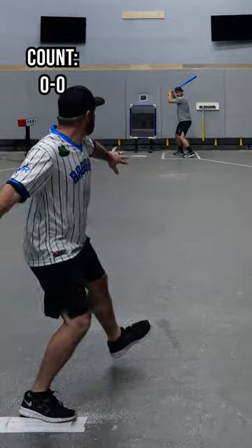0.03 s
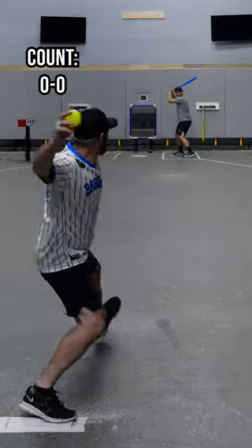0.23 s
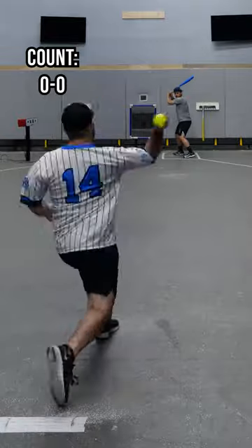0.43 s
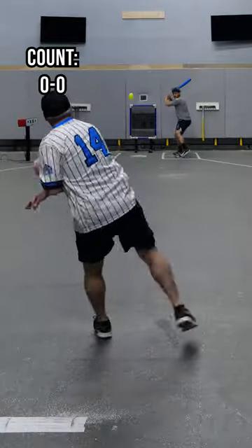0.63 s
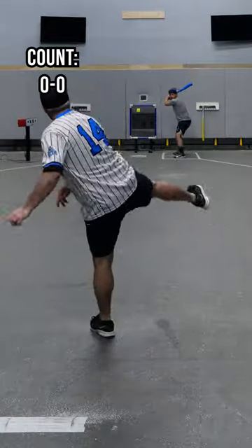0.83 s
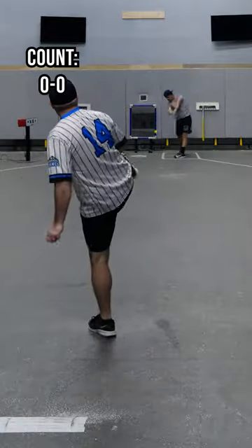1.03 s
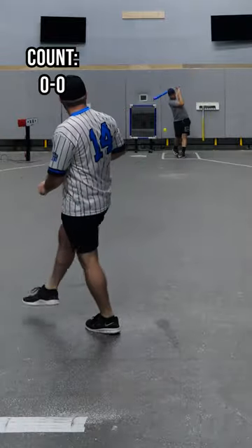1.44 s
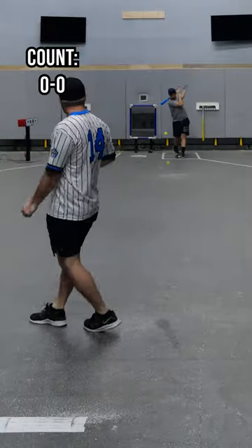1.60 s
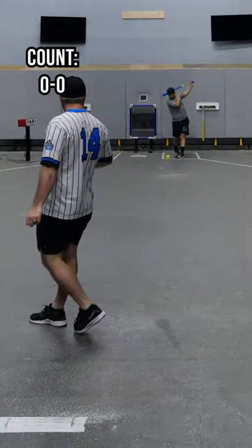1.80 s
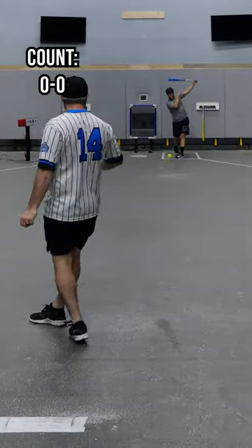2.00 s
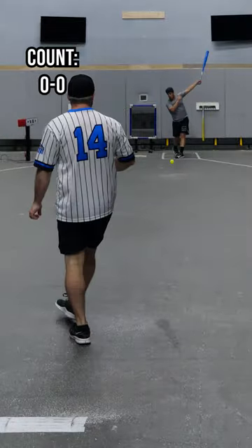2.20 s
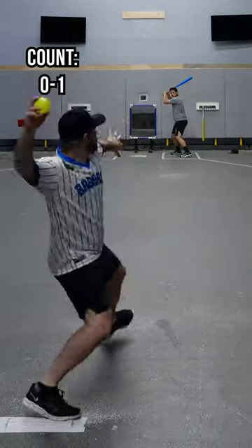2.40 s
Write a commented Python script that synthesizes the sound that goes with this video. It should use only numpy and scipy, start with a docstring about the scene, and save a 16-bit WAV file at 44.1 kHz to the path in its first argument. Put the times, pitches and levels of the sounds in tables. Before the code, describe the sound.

A pitched plastic ball cracks against a distant backboard in a large gym, after a faint arm swish and whir. The echo rings on, two sharp clicks sound near the microphone, then it cuts off, leaving ventilation rumble.

```python
"""A large gym, one microphone, ventilation rumbling. An arm swishes through a pitch and the spinning plastic
ball whirs across the hall; a faint click, the thud of a foot, a shoe scuff. Far off, the ball cracks against a
hard backboard, which thumps and pings. The crack fills the hall and a limiter holds the echo level for a while.
Two sharp clicks sound close to the microphone, then the echo is cut off abruptly and a softer, deeper rumble is
left."""
import sys
import numpy as np
from scipy import signal
from scipy.fft import rfft, irfft
from scipy.io import wavfile
from scipy.ndimage import uniform_filter1d

SR = 44100
rng = np.random.default_rng(int(sys.argv[2]) if len(sys.argv) > 2 else 0)


def wrap_up_sound(samples):
    """Save the sound to the file named by the first command line argument, as 16-bit audio."""
    columns = np.atleast_2d(samples).T
    # keep every value between -1 and 1, then stretch to whole-number steps
    tamed = np.clip(columns, -1, 1)
    steps = np.round(tamed * 32767).astype(np.int16)
    wavfile.write(sys.argv[1], SR, steps)


N = 112454
TIME = np.arange(N) / SR
HIT_S = 1.2628  # the ball meets the backboard


def amp(db):
    """Decibels to gain."""
    return 10 ** (np.asarray(db) / 20)


def read(points, hz):
    """Reads a table on a log-frequency axis."""
    table_hz, value = np.transpose(points)
    return np.interp(np.log(hz + 1), np.log(table_hz + 1), value)


def since(start_s):
    """Time since start_s, zero before it."""
    return np.maximum(TIME - start_s, 0)


def later(x, delay_s):
    """Delays a sound."""
    return np.pad(x, (round(delay_s * SR), 0))[:N]


def noise(colour):
    """Steady noise of rms 1; colour has columns frequency_hz, level_db."""
    gain = amp(read(colour, np.fft.rfftfreq(N, 1 / SR)))
    shaped = irfft(rfft(rng.standard_normal(N)) * gain, N)
    return shaped / np.sqrt(np.mean(shaped ** 2) + 1e-20)


def snap(start_s, colour, t60_s, size=4096):
    """A very short noise burst of energy 1 with the given spectrum."""
    burst = rfft(rng.standard_normal(size) * amp(-60 * TIME[:size] / t60_s))
    log_gain = np.log(amp(read(colour, abs(np.fft.fftfreq(size, 1 / SR)))))
    minimum_phase = np.exp(np.conj(signal.hilbert(log_gain)))[:len(burst)]  # keeps the attack sharp
    sound = irfft(burst * minimum_phase, size)
    return np.pad(sound / np.linalg.norm(sound), (round(start_s * SR), N))[:N]


def hall_echo(colour=((20, 0), (20000, 0))):
    """The gym's dense reflections, energy 1: they build quickly, the bass later, and lose treble first."""
    # decay of the hall: frequency_hz, t60_s
    decay = [(120, 1.6), (400, 4), (1000, 3.8), (2000, 2.67), (3600, 2.11), (5600, 1.405), (8400, 0.92),
             (11500, 0.58), (15000, 0.37)]
    gap_s, build_s = 0.0019, 0.017
    bloom_db, bloom_s, bloom_hz = -1.5, 0.19, 1200
    hz, t, spectrum = signal.stft(noise(colour), SR, nperseg=512)
    bass_lag_db = bloom_db * np.exp(-t / bloom_s) / (1 + (hz[:, None] / bloom_hz) ** 2)
    decay_db = -60 * t / read(decay, hz)[:, None]
    tail = signal.istft(spectrum * amp(bass_lag_db + decay_db), SR, nperseg=512)[1][:N]
    tail *= 1 - np.exp(-since(gap_s) / build_s)
    return tail / np.linalg.norm(tail)


def in_hall(x, wet_db):
    """A sound as it reaches the microphone: direct, plus the hall's echo."""
    return x + amp(wet_db) * signal.fftconvolve(x, hall_echo())[:N]


def swell(peak_s, rise_s, fall_s):
    """An envelope that grows exponentially to 1 and dies away."""
    t = TIME - peak_s
    return np.exp(np.minimum(t / rise_s, -t / fall_s))


def ventilation():
    """Room tone: moving air rumbles steadily through the gym."""
    # spectrum of the ventilation: frequency_hz, level_db
    colour = [(30, -65), (65, -33), (105, -15), (150, -5.5), (250, -4.5), (310, -8.5), (400, -4.5),
              (540, -15), (780, -18.5), (1050, -16.5), (1500, -31), (2100, -36), (3000, -46.5),
              (5000, -49.5), (11500, -50), (15500, -62)]
    return amp(-29.5) * noise(colour)


def arm_swish():
    """The pitcher's arm swings with a rubbing noise that swells and fades."""
    # spectrum of the swish: frequency_hz, level_db
    colour = [(500, -36), (1500, 12), (3500, -6), (6000, -2.5), (9000, 0), (12000, 2.5), (14500, -4),
              (15500, -9)]
    envelope = swell(peak_s=0.515, rise_s=0.073, fall_s=0.03)
    return in_hall(amp(-48) * envelope * noise(colour), wet_db=5)


def ball_whir(spin_hz=72, spin_depth=0.48):
    """Air flutters over the flying ball in a band of noise that throbs with the spin."""
    # stretches of whirring: start_s, end_s, level_db, centre_hz, width_octaves
    whirs = [(.5, 0.723, -57.5, 2670, 0.42), (0.88, 1.057, -50, 1990, 0.38)]
    flutter = np.zeros(N)
    for start_s, end_s, db, hz, octaves in whirs:
        near, far = 2 ** octaves, 8 ** octaves
        band = noise([(hz / far, -25), (hz / near, -5), (hz, 0),
                      (hz * near, -5), (hz * far, -25), (hz * 10, -50)])
        envelope = np.minimum(since(start_s) / 0.0093, 1) * np.exp(-since(end_s) / 0.046)
        flutter += amp(db) * envelope * band
    throb = 1 + spin_depth * np.sin(2 * np.pi * spin_hz * TIME)
    return in_hall(flutter * throb, wet_db=-2.5)


def clicks(wet_db=2.5):
    """Small hard clicks near the microphone arrive direct, off single surfaces, then from the hall."""
    # the clicks: start_s, level_db
    events = [(0.89, -29), (1.9923, -6), (2.0137, -0.5)]
    # spectrum of a click: frequency_hz, level_db
    colour = [(300, -22), (2000, -7), (4500, -7), (6000, -4), (7500, 0), (10500, 1), (13000, -12),
              (15500, -18)]
    # reflections from floor, ceiling and walls: delay_s, level_db
    surfaces = [(0.0163, -10), (0.041, -11.5), (.071, -12.5), (.14, -19)]
    out = np.zeros(N)
    for start_s, db in events:
        direct = snap(start_s, colour, t60_s=0.0059)
        reflections = sum(amp(bounce_db) * later(direct, delay_s) for delay_s, bounce_db in surfaces)
        echo = amp(wet_db) * later(hall_echo(colour), start_s)
        out += amp(db) * (direct + reflections + echo)
    return out


def footfall(start_s=1.165, hz=185, t60_s=0.41):
    """The pitcher's foot lands with a soft low thud."""
    t = since(start_s)
    thud = noise([(hz / 3, -35), (hz, 0), (hz * 2.8, -10), (hz * 10, -45), (hz * 30, -80)])
    return amp(-24 - 60 * t / t60_s) * np.minimum(t / 0.0084, 1) * thud


def shoe_scuff():
    """A sole rubs briefly over the gym floor."""
    # spectrum of the scuff: frequency_hz, level_db
    colour = [(500, -7), (2000, 7), (3500, 1), (6000, -6), (10500, -2), (11500, 3), (12300, -4),
              (14000, -8), (15500, -20)]
    envelope = swell(peak_s=1.2, rise_s=0.055, fall_s=0.034)
    return in_hall(amp(-45.5) * envelope * noise(colour), wet_db=4)


def ball_crack():
    """The ball's shell snaps on the board; at this distance nearly all of it arrives as echo."""
    # spectrum of the crack: frequency_hz, level_db
    colour = [(60, -35), (130, -7), (250, -0.5), (500, -1.5), (900, -2), (1400, 0), (2100, 2), (2900, -0.5),
              (3900, -0.96), (5200, -2.5), (6500, -1.5), (7800, 1), (9500, 1), (10500, 1), (11300, 4.5),
              (12100, 0.5), (13000, -2), (15500, -15)]
    echo = later(hall_echo(colour), HIT_S)
    direct = snap(HIT_S, colour, t60_s=0.027)
    return amp(-4) * direct + amp(32) * echo


def board_thump(rise_s=0.0028):
    """The struck backboard thumps and rings briefly, radiating little deep bass."""
    # modes of board and ball: pitch_hz, level_db, t60_s
    modes = [(190.7, -13, 0.15), (256, -10, 0.038), (383, -8, 0.043), (577, -14, 0.03), (762, -12, .04),
             (1316, -21.5, 0.064), (2280, -31, .06), (2740, -24, .05)]
    t = since(HIT_S + 0.00148)
    ring = sum(amp(db - 60 * t / t60_s) * np.sin(2 * np.pi * hz * t) for hz, db, t60_s in modes)
    low_cut = signal.butter(2, 130, "high", fs=SR, output="sos")
    thump = signal.sosfilt(low_cut, ring * np.minimum(t / rise_s, 1))
    return in_hall(thump, wet_db=-6)


def frame_ping(start_s=1.276, pitch_hz=1682, rise_s=0.0028, t60_s=0.069):
    """The board's shaken frame gives a short ping just after the thump."""
    t = since(start_s)
    envelope = amp(-5 - 60 * t / t60_s) * np.minimum(t / rise_s, 1)
    return in_hall(envelope * np.sin(2 * np.pi * pitch_hz * t), wet_db=-5.5)


def quiet_hall():
    """Closing room tone: a steady rumble, a little softer and deeper."""
    # spectrum of the deeper rumble: frequency_hz, level_db
    colour = [(30, -60), (60, -37), (100, -0.5), (160, 0), (230, -4), (330, -8.5), (520, -15), (1100, -18),
              (1550, -27.5), (2100, -36), (3000, -41.5), (4500, -47), (11500, -46), (15500, -55)]
    return amp(-31) * noise(colour)


def scene(quiet_s=2.293, crossfade_s=0.0036):
    """The pitch gives way abruptly to the quiet hall; one microphone feeds both channels."""
    pitch = ventilation() + arm_swish() + ball_whir() + clicks() + footfall() + shoe_scuff()
    impact = ball_crack() + board_thump() + frame_ping()
    quiet_share = np.clip((TIME - quiet_s) / crossfade_s + 0.5, 0, 1)
    fade_in = np.clip((TIME - 0.0567) / 0.00036, 0, 1)
    mono = fade_in * ((1 - quiet_share) * (pitch + impact) + quiet_share * quiet_hall())
    return np.array([mono, mono])


def record(dry):
    """Behind the microphone a limiter ducks quickly and recovers steadily; a low-pass trims the top."""
    threshold_db, ratio, window_s, recover_db_per_s = -14.9, 22, 0.0068, 62
    power = uniform_filter1d(dry[0] ** 2, round(window_s * SR))
    power_db = 10 * np.log10(abs(power) + 1e-12)
    recovery_db = TIME * recover_db_per_s
    held_db = np.maximum.accumulate(power_db + recovery_db) - recovery_db
    over_db = uniform_filter1d(np.maximum(held_db - threshold_db, 0), size=128)
    limited = dry / amp((1 - 1 / ratio) * over_db)
    low_pass = signal.firwin(511, 15650, window=("kaiser", 9), fs=SR)
    return signal.oaconvolve(limited, low_pass[None], "same")


dry = scene()
out = record(dry)
wrap_up_sound(out)
```